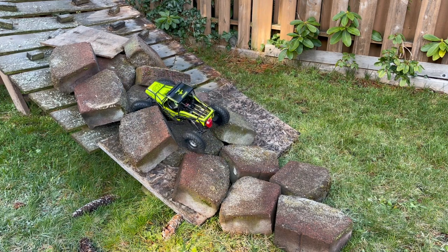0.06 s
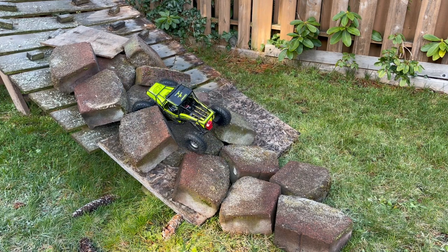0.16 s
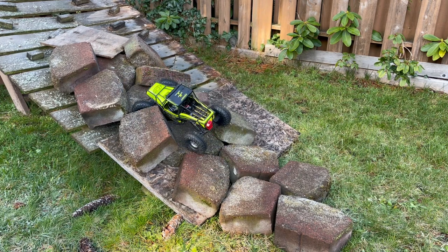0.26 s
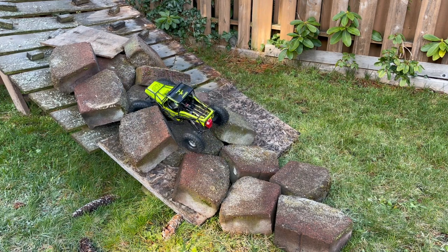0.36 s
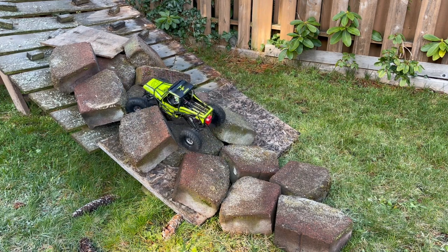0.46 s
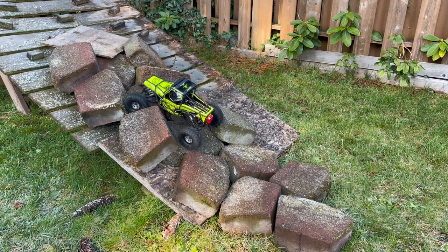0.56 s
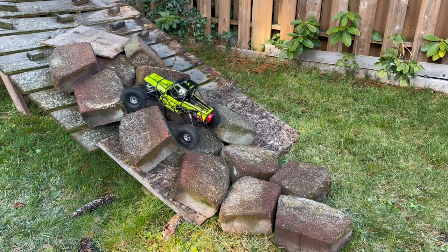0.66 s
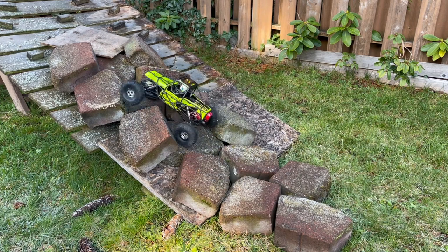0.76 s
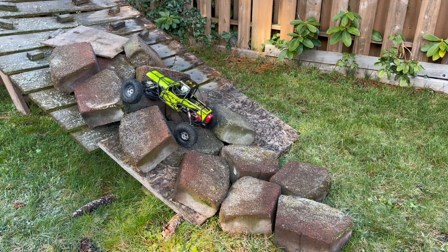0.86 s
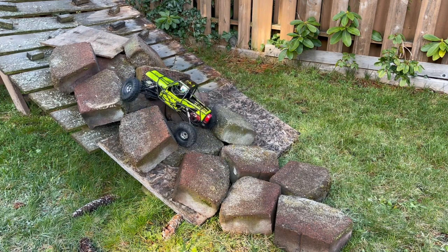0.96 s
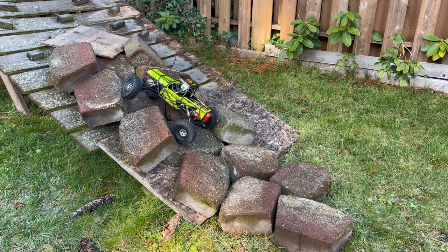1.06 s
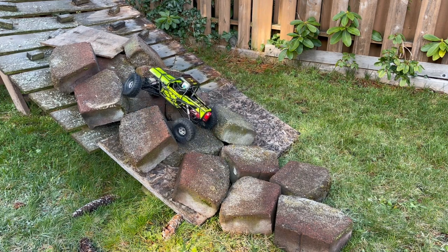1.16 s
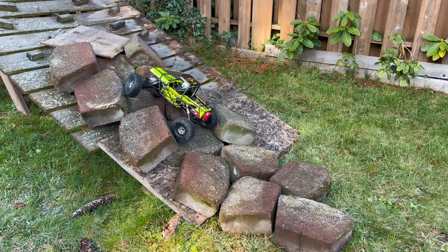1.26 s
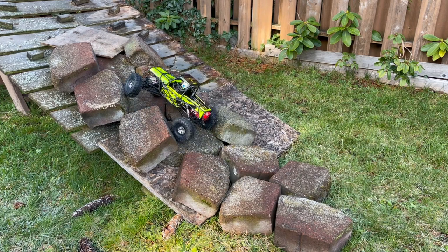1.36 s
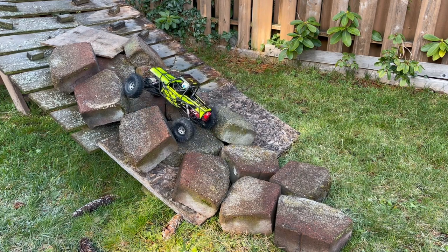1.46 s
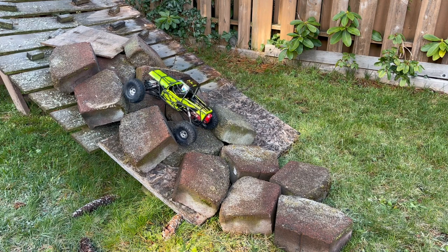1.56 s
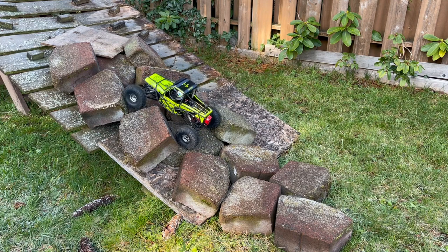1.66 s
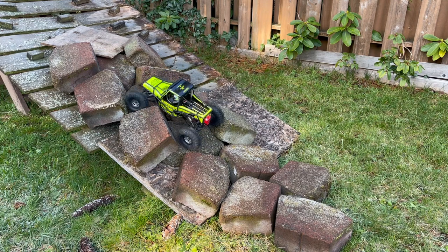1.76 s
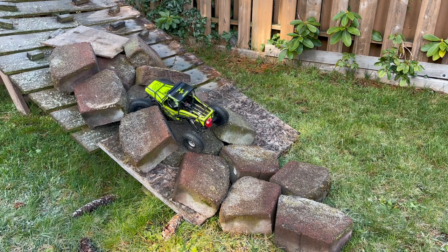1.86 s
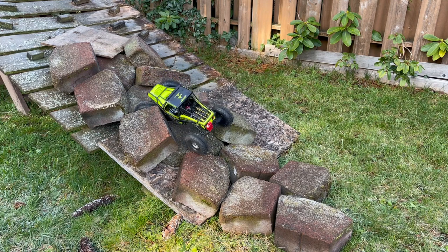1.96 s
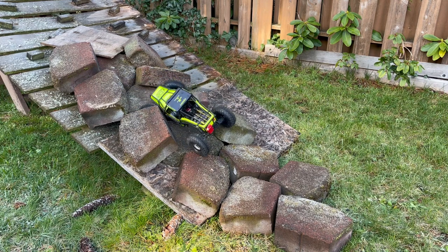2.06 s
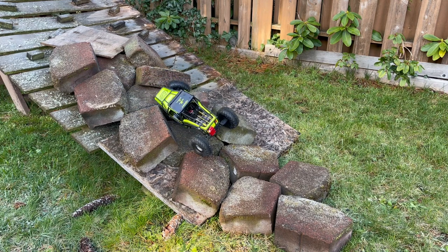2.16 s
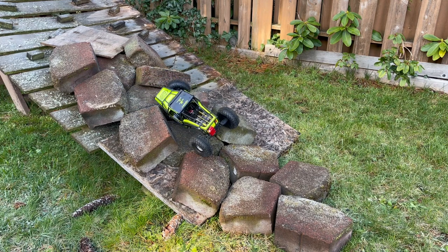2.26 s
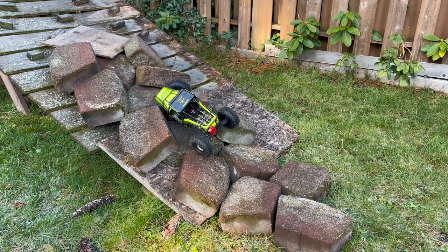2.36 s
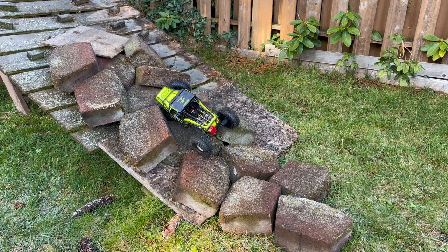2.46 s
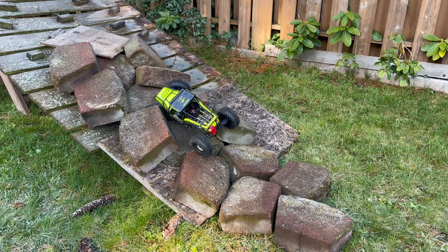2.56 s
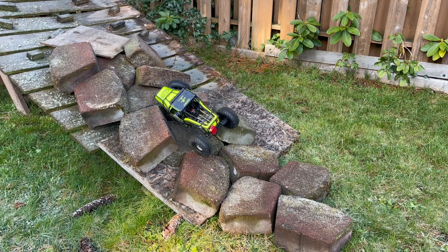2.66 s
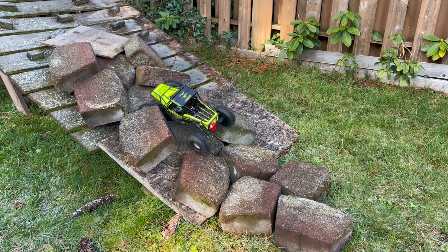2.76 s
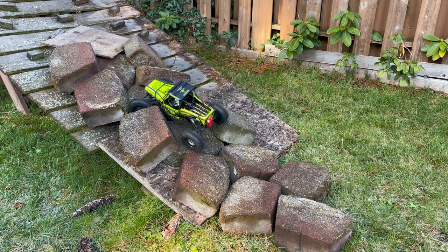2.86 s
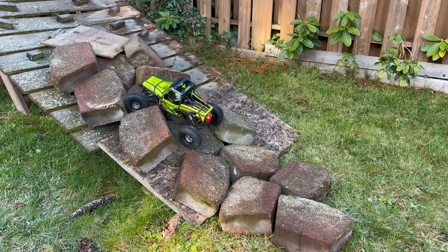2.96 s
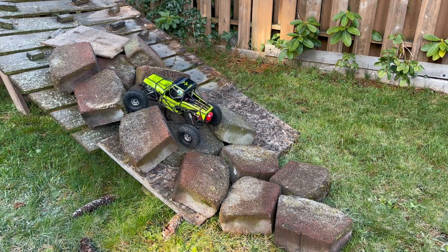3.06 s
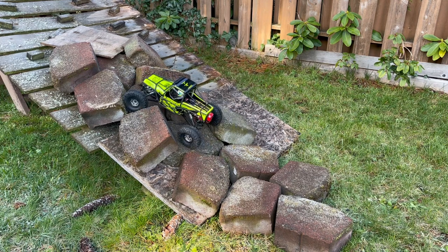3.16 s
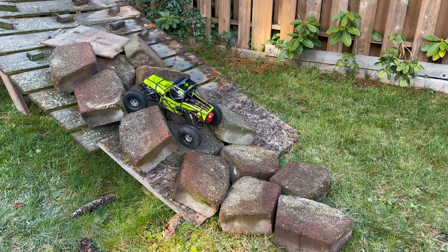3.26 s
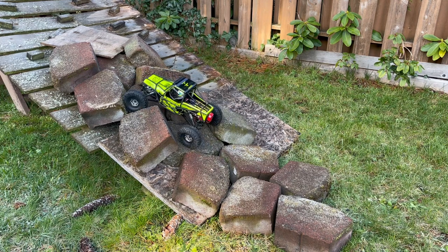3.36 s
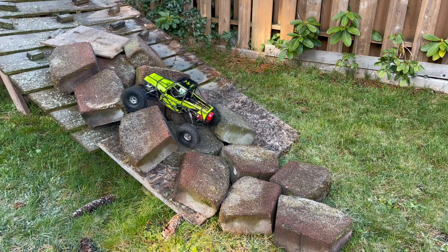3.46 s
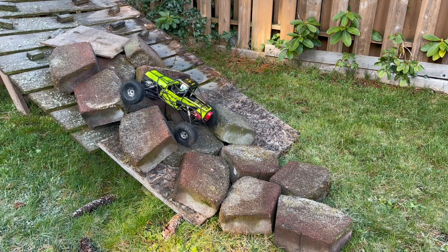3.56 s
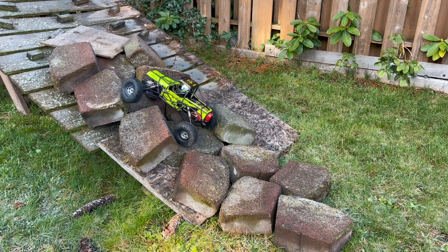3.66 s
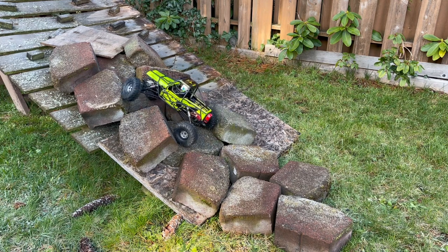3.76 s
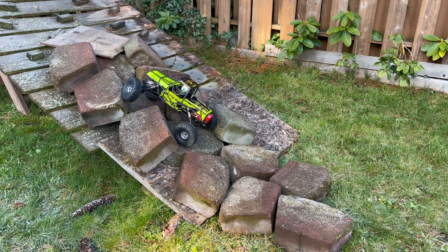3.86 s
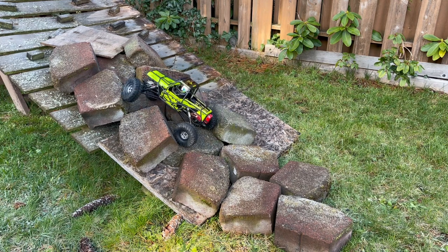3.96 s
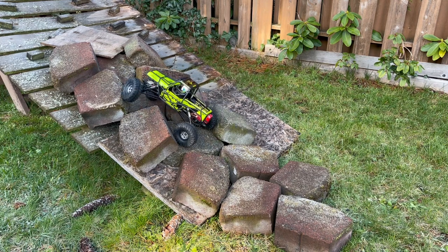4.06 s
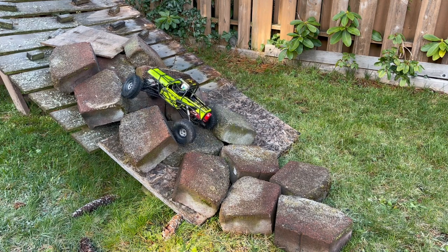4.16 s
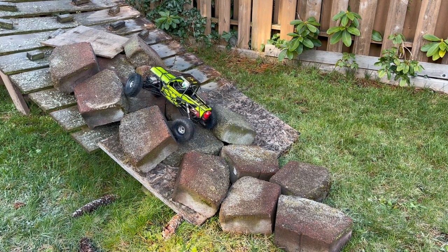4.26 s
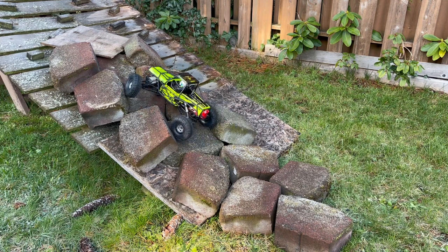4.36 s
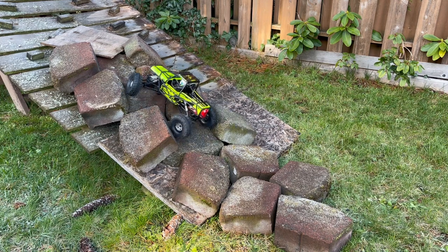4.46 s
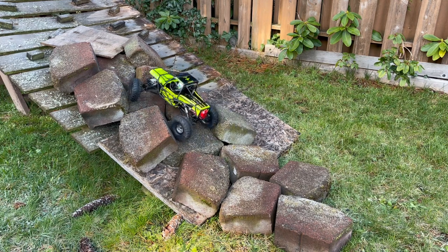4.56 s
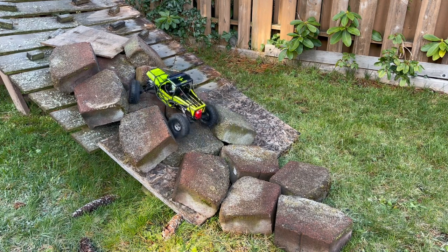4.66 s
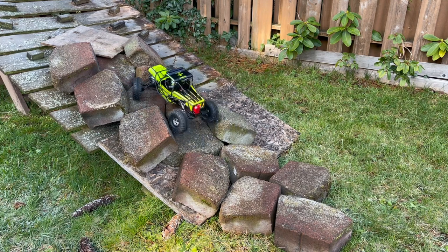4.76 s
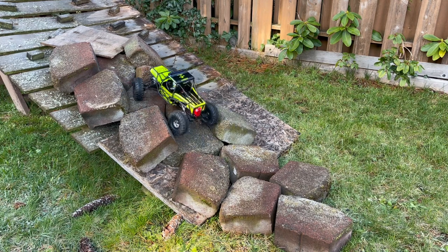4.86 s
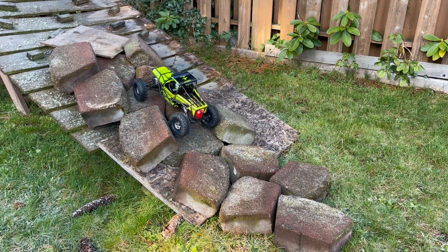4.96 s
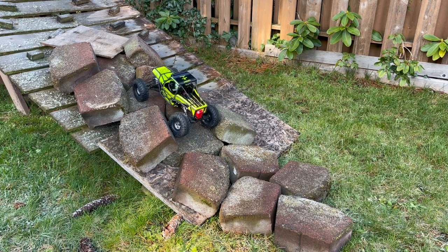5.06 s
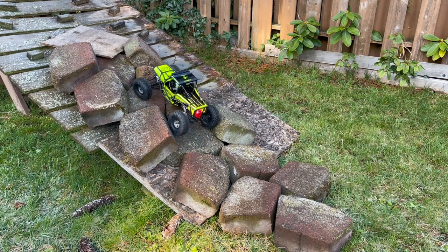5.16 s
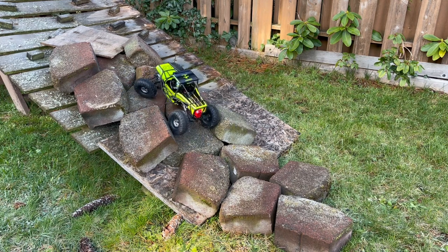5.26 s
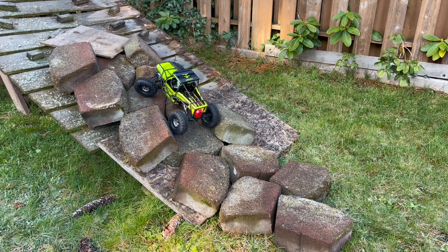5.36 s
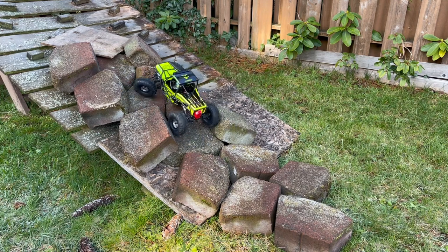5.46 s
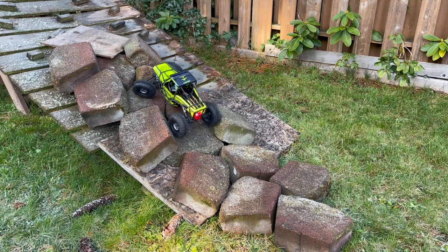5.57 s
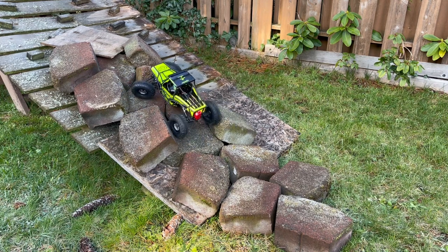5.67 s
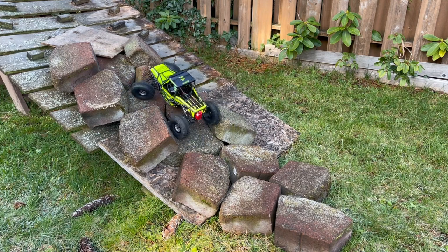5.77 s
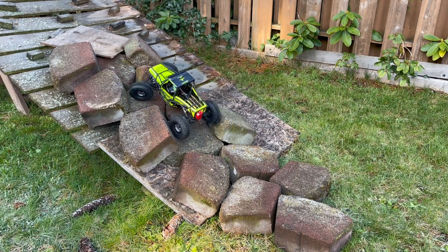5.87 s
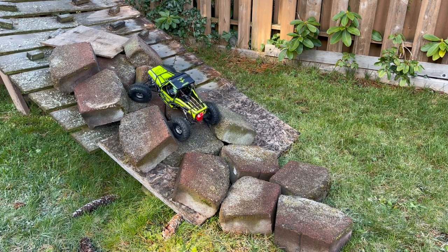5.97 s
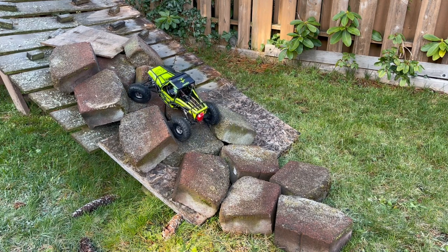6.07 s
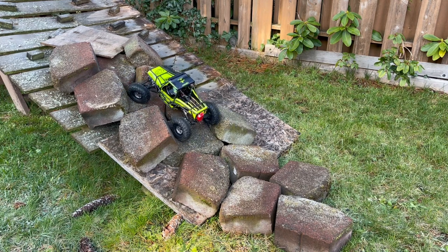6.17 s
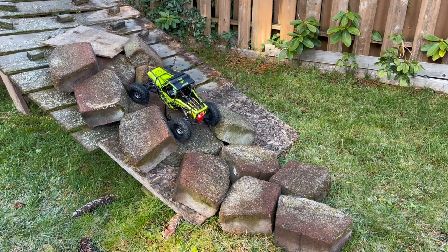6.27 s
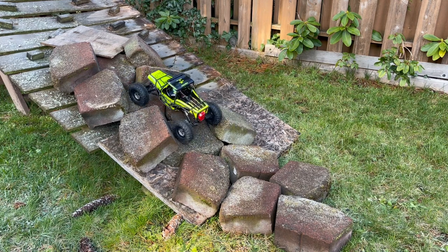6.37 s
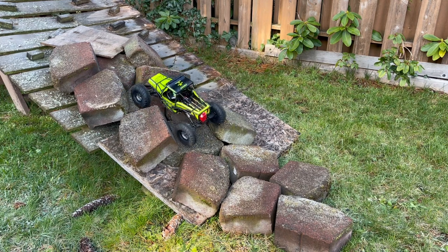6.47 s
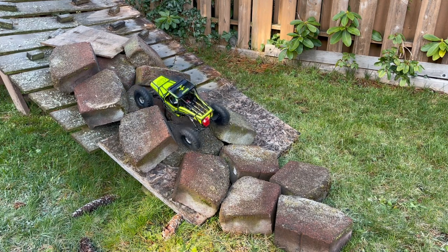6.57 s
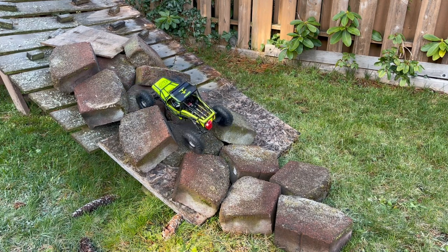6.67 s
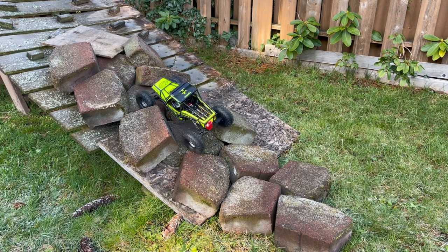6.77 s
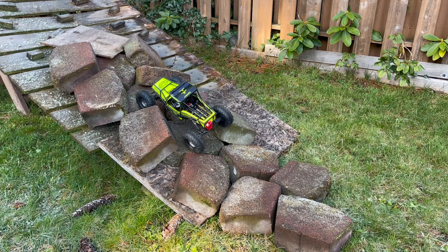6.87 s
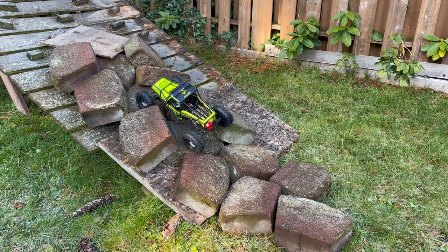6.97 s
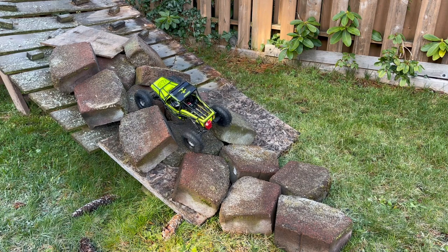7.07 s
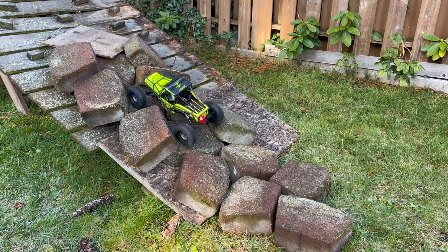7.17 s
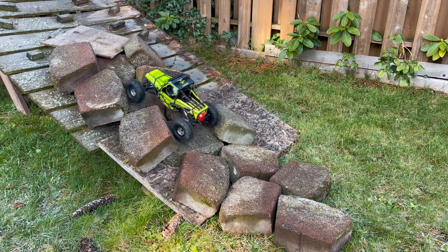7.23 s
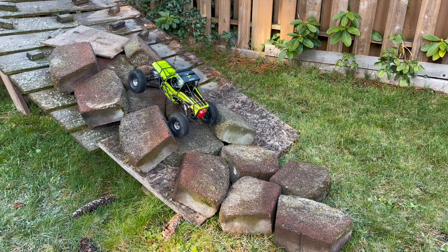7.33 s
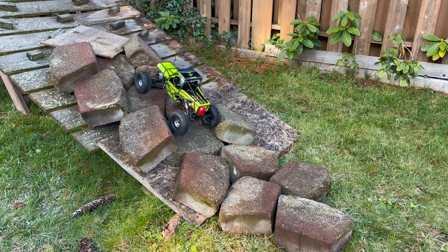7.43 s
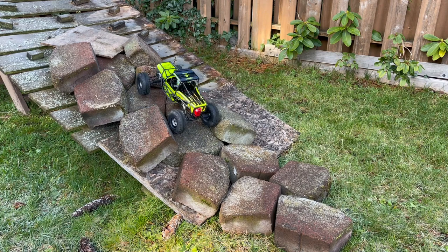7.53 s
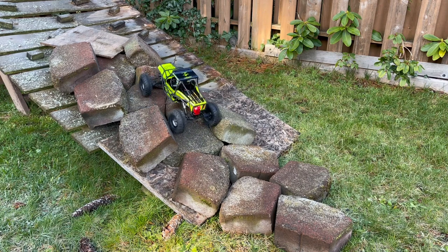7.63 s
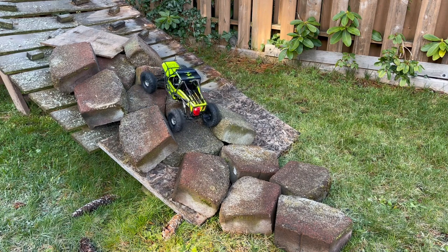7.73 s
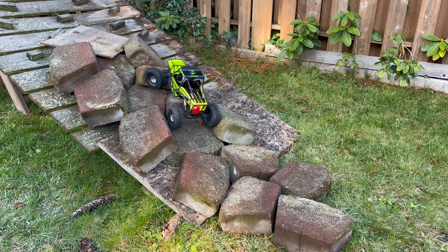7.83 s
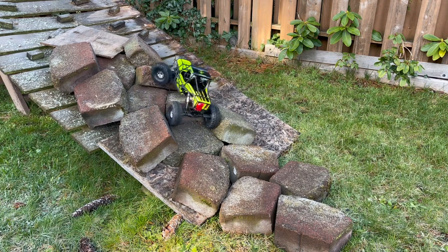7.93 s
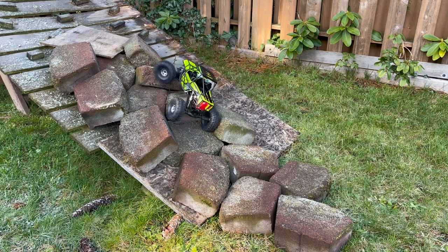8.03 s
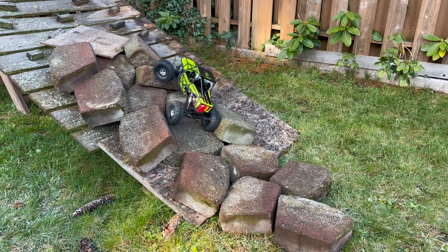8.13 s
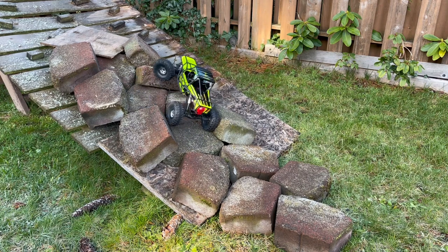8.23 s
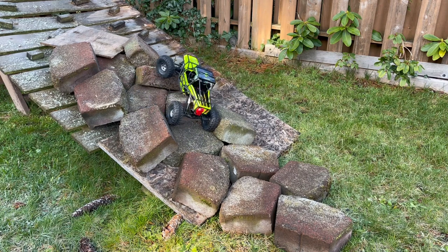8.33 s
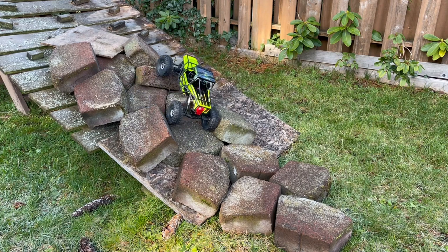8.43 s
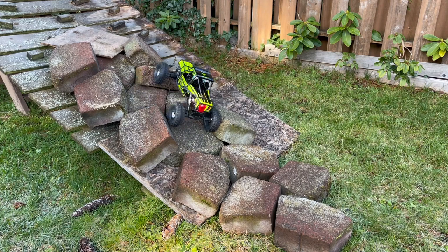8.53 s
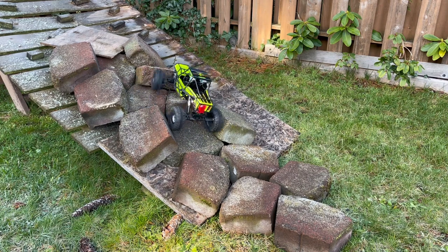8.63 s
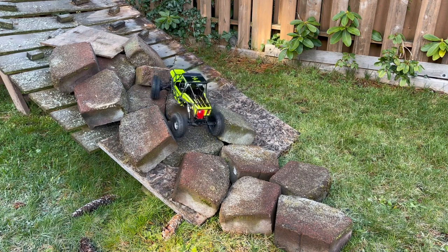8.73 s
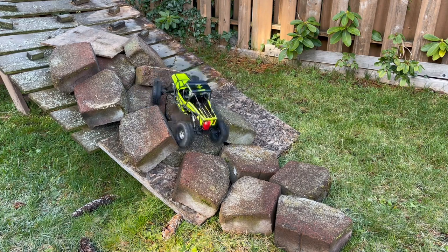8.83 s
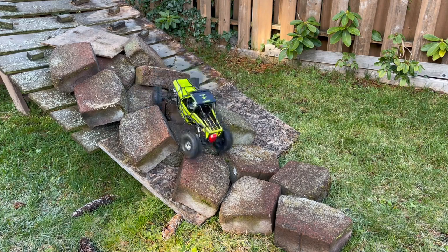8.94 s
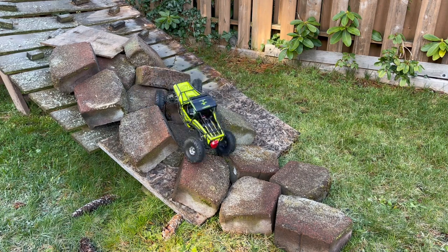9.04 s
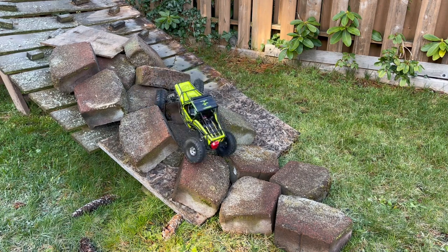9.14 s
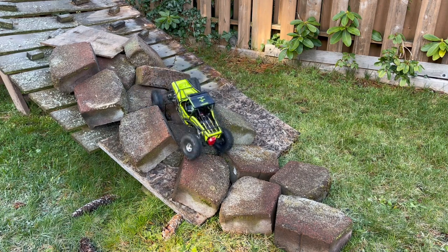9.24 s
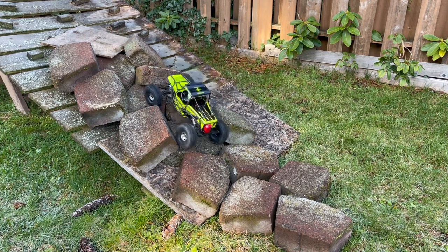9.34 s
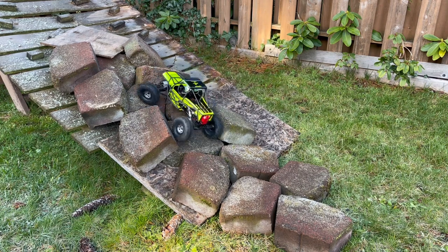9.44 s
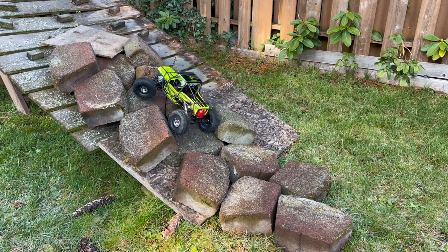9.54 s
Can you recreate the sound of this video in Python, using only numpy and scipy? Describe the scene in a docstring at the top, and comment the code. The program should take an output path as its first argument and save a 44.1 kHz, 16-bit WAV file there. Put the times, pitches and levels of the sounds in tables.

```python
"""A backyard of bricks: a small radio-controlled truck crawls over them in stop-start bursts of throttle.
Two gear stages whine and rasp as tones and noise that glide with the motor; brushes sizzle with it.
Damped noise gives knocks, ticks and snapping grit; unsteady sines at set pitches give short squeals.
Mostly in the pauses the steering servo buzzes as pulsed noise and the speed controller whistles faintly.
A far engine drones behind, with steady hums and the dull wash of the outdoors."""
import sys
import numpy as np
from scipy import signal
from scipy.fft import rfft, irfft, next_fast_len
from scipy.io import wavfile

SR = 44100
rng = np.random.default_rng(int(sys.argv[2]) if len(sys.argv) > 2 else 0)


def bounce(signal):
    """Save signal as a 16-bit WAV file at the path given by the first command-line argument."""
    frames = np.transpose(np.atleast_2d(signal))
    limited = np.clip(frames, -1, 1)
    pcm = np.round(limited * 32767).astype(np.int16)
    wavfile.write(sys.argv[1], SR, pcm)


N = 423360
TIME = np.arange(N) / SR
SIZE = next_fast_len(N + SR // 2)
BINS = np.maximum(np.arange(SIZE // 2 + 1) * SR / SIZE, 1)

PINION_TEETH = 20
# play in the gears: phase shake and once-a-turn phase swing, both in radians
BACKLASH, RUNOUT = .16, .26
# rate (Hz) at which the gear tones flutter as the load shifts
BREAK_HZ = 55


def from_db(db):
    """Logarithmic level: decibels become an amplitude gain."""
    return 10 ** (np.asarray(db) / 20)


def rms_one(x):
    """Power normalisation: scale to a mean square of one."""
    return x / np.sqrt(np.mean(x ** 2) + 1e-20)


def over_bins(points):
    """Spectral interpolation: read a table of (Hz, value) on a log-frequency axis."""
    hz, value = np.transpose(points)
    return np.interp(np.log(BINS), np.log(hz), value)


def shaped(x, gain):
    """Linear filtering: multiply the spectrum by a gain for each frequency."""
    return irfft(rfft(x, SIZE) * gain, SIZE)[..., :N]


def coloured(x, points):
    """Spectral colouring: filter by a spectrum in dB."""
    return shaped(x, from_db(over_bins(points)))


def drift(rate_hz, order=32):
    """Low-passed random process: slow chance of spread 1, drawn at a coarse step."""
    coarse = TIME[::order]
    hz = np.arange(len(coarse) // 2 + 1) * SR / N
    spectrum = rfft(rng.standard_normal(len(coarse))) / (1 + (hz / rate_hz) ** 2)
    slow = irfft(spectrum, len(coarse))
    return np.interp(TIME, coarse, rms_one(slow))


def switched(rows, ramp_s):
    """Gating: summed envelopes with straight ramps, from rows of start and end in seconds and dB."""
    total = 0
    for start, end, db in rows:
        edge_distance = np.minimum(TIME - start, end - TIME)
        total = total + from_db(db) * np.clip(edge_distance / ramp_s + .5, 0, 1)
    return total


def wide_noise(spread_db):
    """Source extent: the two ports hear slightly different mixtures of noise from a body of some size."""
    common = rng.standard_normal(N)
    difference = from_db(spread_db) * rng.standard_normal(N)
    return common + difference * [[1], [-1]]


def throttle(fade_s):
    """Motor dynamics: tooth rate, load, sizzle and whine offsets, and on-off envelope, burst by burst."""
    # Throttle bursts. Each row: start and end in seconds, offset of the brush sizzle in dB.
    bursts = [(-.05, .19, 3), (0.249, 1.304, -2.5), (1.499, 2.1, 1.5), (2.021, 2.379, 6.5),
              (2.599, 3.052, -1), (3.38, 3.819, 0), (4.079, 4.51, -1), (4.405, 4.82, 1.5),
              (5.11, 6.013, -0.2), (6.25, 6.723, 2), (7.015, 8.278, -0.6), (8.44, 9.124, 3),
              (9.15, 9.651, 1.5)]
    # The motor within each burst: gripping tyres slow it, the load rises and the gears sing out.
    # Each row: time in seconds, nominal tooth rate of the pinion in Hz, load in dB before its
    # flutter, offset of whine over rasp in dB.
    motor = [
        [(0.0, 1005, 3.5, -9), (0.09, 846, 1.5, -3)],
        [(0.3, 1082, 2.5, -4), (0.37, 1095, 2.5, 1), (0.41, 1343, 2, -3), (0.475, 1539, 2, -12),
         (0.505, 1445, 3, -5), (0.54, 1581, 3.5, -4), (0.655, 1870, 3.5, -7), (0.7, 1802, 4, -5),
         (0.735, 1633, 4.5, 0), (0.775, 1987, 2, -5), (0.8, 1759, 3.5, -3), (0.825, 1927, 2.5, -8),
         (0.86, 2032, 1.5, 2.5), (0.907, 1540.0, 7, -5.5), (0.952, 2006, 1.5, -1), (1.0, 1676, 4, -1),
         (1.025, 1960, 2.5, -9), (1.065, 1702, 6, 0), (1.105, 1730, -0.5, 3.5), (1.145, 1580, 3, 3),
         (1.19, 1731, 3.5, -1.5), (1.24, 1673, 4, -1)],
        [(1.615, 1500, 3.5, -14.5), (1.71, 1665, 2, -10), (1.79, 1767, 1.5, -7), (1.85, 1943, -1, -11),
         (1.92, 2003, -0.5, -22), (1.99, 1780.0, 2, -8), (2.047, 1545, 1.5, -11)],
        [(2.065, 1281, 3.5, 3), (2.12, 1291, -2, 4), (2.14, 1196, -2.5, 9.5), (2.175, 1207, -2, 5.5),
         (2.215, 883, 4, 0), (2.26, 1093, -2.5, 6)],
        [(2.65, 1381.0, 4.5, -13), (2.725, 1726, 4, 1.5), (2.804, 2343, 1, -3.5), (2.949, 2508, -1.5, -1.5),
         (2.979, 1725, 2, -2.5)],
        [(3.446, 1153, 4.5, -10), (3.487, 1756, 1, -0.5), (3.546, 1801, 4.5, -3), (3.59, 2200, -1, 0),
         (3.625, 2101, -1.5, 3.5), (3.654, 2227, 2, 1), (3.693, 1955, -1, 3.5), (3.725, 1187, 7.5, -6.5)],
        [(4.13, 1491, 2.5, 0), (4.16, 2033, 5.5, -4.5), (4.21, 2516, -1.5, -3), (4.23, 2422, 4.5, -10),
         (4.255, 2498, 0, -8), (4.304, 2211, -1.5, 2.5), (4.34, 1650, 3, 1), (4.365, 1853, 1.5, 0),
         (4.39, 1500.0, 0, -1)],
        [(4.465, 1152, 4, -1.5), (4.485, 1606, 2, -3.5), (4.51, 2073, -2, 3.5), (4.535, 2613, 0.5, -9),
         (4.566, 2855, 0, -4), (4.61, 2104, 4, -2), (4.66, 2720, -1, -2), (4.7, 2108, 2, -5.5),
         (4.745, 1515, 0.5, 0.5)],
        [(5.19, 1588, 5, -3.5), (5.225, 1844, 0.5, -2.5), (5.255, 2300.0, 1, -1), (5.29, 2118, 3, 0.5),
         (5.325, 1898, 6, -4.5), (5.36, 2040, 1, 2.5), (5.385, 2291, 2.5, -3.5), (5.418, 2293, -2.5, 4.5),
         (5.448, 1828, 6.5, 2.5), (5.475, 1932, 4, 0.5), (5.5, 2222, 0.5, 0), (5.515, 2130, 3.5, -1),
         (5.535, 2412, -0.5, -4), (5.57, 2110, 3.5, -1), (5.595, 1828, 4.5, -1), (5.625, 2202, 2.5, -8),
         (5.652, 1995, 4.5, -4), (5.695, 2608, 0, -4), (5.795, 2914, 1.5, -8), (5.835, 2297, 3.5, -2),
         (5.893, 2836, -2.5, -2), (5.935, 2017, 1.5, -1.5)],
        [(6.262, 1364, -13.5, 5), (6.31, 1445, 3, -12), (6.39, 1480, 0, -4), (6.43, 1620, 2.5, -13),
         (6.48, 1830, 0, -19), (6.55, 1466, 0, -11), (6.61, 1175, 1.5, -6)],
        [(7.085, 1783, 2.5, -1.5), (7.135, 2802, -1, 4), (7.215, 3113, -1.5, 1), (7.26, 2886, 2, -3),
         (7.295, 2580, 1, 1), (7.34, 2634, 2, -2), (7.385, 3083, -2, -3.5), (7.448, 3443, 0, -9.5),
         (7.485, 2735, 1, 4), (7.516, 2053, 2, 1), (7.56, 2800, -0.5, 1), (7.622, 3164, 0, -4),
         (7.655, 2800, 4, -7), (7.735, 2718, 3.5, 0), (7.762, 2513, -1, 6.5), (7.818, 2936, 0.5, -2.5),
         (7.86, 2644, 4, -3), (7.915, 2876, 1, -5), (7.95, 3063, 1.0, -3), (8.02, 3057, 1, -5.5),
         (8.045, 2948, 4, -7), (8.17, 2975, 2, -4), (8.195, 2597, 2, -10), (8.225, 2090, 5.5, -5)],
        [(8.49, 1898, 0, -11), (8.6, 2052, 2.5, -30), (8.7, 2105, 0, -12), (8.82, 2032, -1, -5),
         (8.98, 2070, -2.5, -9), (9.05, 1984, -1.5, -7)],
        [(9.205, 2007, 1.5, -3), (9.27, 2470, -1, 2.5), (9.295, 2810, -2.5, 5), (9.35, 3046, -1, 1.5),
         (9.43, 3180.0, 0, -5), (9.465, 2780.0, 3, -6), (9.51, 2596, 3.5, -8), (9.59, 2369, 2.5, 1.5)],
    ]
    # every burst spins up from this tooth rate and coasts back to it,
    # while the load runs to a set value at the end
    crawl_hz, coast_load_db = 498.9, -0.5
    coast_whine_db = -7   # the gears run slack at both ends of a burst
    mesh_hz, running = np.full(N, float(crawl_hz)), np.zeros(N)
    load_db, sizzle_db, whine_db = np.zeros((3, N))
    for (start, end, sizzle), rows in zip(bursts, motor):
        s, hz, load, whine = np.transpose(rows)
        whole_burst = [start, *s, end]
        speed = np.interp(TIME, whole_burst, [crawl_hz, *hz, crawl_hz])
        on = speed > mesh_hz   # a new burst may catch the motor while it still coasts
        mesh_hz[on] = speed[on]
        load_db[on] = np.interp(TIME[on], [*s, end], [*load, coast_load_db])
        sizzle_db[on] = sizzle
        whine_db[on] = np.interp(TIME[on], whole_burst, [coast_whine_db, *whine, coast_whine_db])
        running = np.maximum(running, switched([(start, end, 0)], fade_s))
    return mesh_hz, load_db, sizzle_db, whine_db, running


def with_speed(mesh_hz, knee_hz, power):
    """Power law with saturation: gain rises as a power of the speed and levels off above a knee."""
    return 1 / np.hypot(1, (knee_hz / mesh_hz) ** power)


def backlash_shake(mesh_hz, load_db):
    """Backlash: phase shake grows with load, at low speed where gears chatter, and a little at high speed."""
    smooth_hz = 1500   # below this tooth rate the motor cogs and the gears chatter
    slack = BACKLASH * np.clip(smooth_hz / mesh_hz, 1, 2) ** 4
    slack += .06 * (mesh_hz / 3000) ** 2
    return slack * from_db(.6 * load_db)   # dB of shake per dB of load


def gear_whine(teeth, wobble, slack):
    """Meshing harmonics, phase-modulated by backlash and runout, throb once a turn through the housing."""
    # Gear tones as multiples of the pinion's tooth rate; the second stage meshes at 0.61 of it.
    orders = [.61, 1, 1.22, 1.61, 2, 3, 3.7, 4]
    # Mean level of each tone in dB, relative to one another before the housing.
    tone_db = [-6, -2, -11, -11, -0.5, -13, -18, -17]
    # Phase shake of each tone as a multiple of the slack; the slow second stage has more play.
    shakes = [2.3, 1.7, 3.2, 3.8, 2.7, 3.6, 5, 5]
    # Response of the housing. Each row: frequency in Hz, gain in dB.
    housing = [(500, 1.5), (800, -5.5), (1030, -3), (1200, -6), (1480, 2), (1800, -6), (2150, -2.5),
               (2450, -6), (2900, 0), (3400, 1.5), (3750, 2), (4100, 5), (4500, -6.5), (5150, -17),
               (5500, -8.5), (6000, -0.5), (6600, 2), (7300, 3.5), (8600, 7.5), (9800, 5.5), (10900, 5),
               (13000, -31)]
    break_db = 3.8   # spread of the flutter as the load shifts
    turn = 2 * np.pi * teeth / PINION_TEETH
    mesh = 2 * np.pi * teeth + wobble * np.sin(turn)
    tones = 0
    for order, db, shake in zip(orders, tone_db, shakes):
        level = from_db(db + break_db * np.minimum(drift(BREAK_HZ), 2))
        tones = tones + level * np.sin(order * mesh + slack * shake * drift(170))
    throb = 1 + .22 * np.cos(turn)
    return coloured(throb * tones, housing)


def once_a_turn(teeth, sharpness):
    """Rotor runout: the pinion bites hardest once a turn, with a lesser bite half a turn later."""
    turn = 2 * np.pi * teeth / PINION_TEETH
    return rms_one(np.exp(sharpness * np.cos(turn)) + np.exp(sharpness * np.cos(2 * turn)))


def worn_teeth(x, teeth, memory):
    """Cyclic correlation: worn teeth return each turn, so the noise partly repeats at the motor's rate."""
    turn_ago = np.interp(teeth - PINION_TEETH, teeth, TIME)
    repeated = np.array([np.interp(turn_ago, TIME, side) for side in x])
    return (x + memory * repeated) / np.hypot(1, memory)


def gear_rasp(teeth, bite, uneven_db):
    """Modulated friction noise: each tooth scrapes with its own strength and excites the gearbox."""
    # Response of the gearbox. Each row: frequency in Hz, gain in dB.
    gearbox = [(100, -3.5), (250, -6), (700, -4.5), (1050, -1.5), (1250, -3.5), (1800, 4), (2350, 1.5),
               (2850, 6), (3500, -2), (3870, 2.5), (4070, 3), (4300, -2), (4700, -3.5), (6000, -6.5),
               (9000, -3), (15000, -58)]
    strength = from_db(uneven_db * rng.standard_normal(N))[teeth.astype(int)]
    pulses = np.exp(bite * np.cos(2 * np.pi * teeth))
    scrape = strength * pulses * wide_noise(spread_db=-23.0)
    return rms_one(coloured(scrape * once_a_turn(teeth, sharpness=0.073), gearbox))


def swells(teeth, ramp_s):
    """Harmonic excitation: teeth pressed hard sing on one harmonic that glides with the motor and flutters."""
    # Swells under strain. Each row: start and end in seconds, multiple of the tooth rate,
    # mean level in dB before the flutter.
    strained = [(0.411, 0.563, 2, -38.5), (0.821, .88, 2, -34), (1.06, 1.25, 1, -52.5),
                (1.625, 1.7, 2, -50), (2.049, 2.13, 1, -52), (2.735, 2.86, 1, -40), (2.76, 2.92, 3, -46),
                (4.195, 4.306, 3, -40), (4.274, 4.387, 1, -51), (4.53, 4.6, 2, -47), (4.675, 4.725, 2, -39),
                (5.239, 5.47, 1, -43), (5.275, 5.315, 2, -42), (5.433, 5.465, 3, -43),
                (5.558, 5.595, 2, -39), (5.575, 5.609, 1, -38), (5.582, 5.61, 3, -44),
                (5.617, 5.662, 2, -38), (5.794, 5.871, 3, -42), (6.435, 6.51, 1, -51),
                (7.599, 7.645, 2, -38), (7.625, 7.708, 1, -38), (7.63, 7.75, 3, -46),
                (7.877, 7.925, 1, -35), (8.037, 8.175, 2, -35.5), (8.04, 8.2, 1, -43),
                (8.039, 8.151, 3, -34.5), (8.581, 8.8, 2, -52), (8.62, 9.04, 1, -52.5),
                (9.345, 9.388, 2, -39), (9.44, 9.5, 1, -38.5), (9.515, 9.612, 3, -39.5)]
    runout = RUNOUT * np.sin(2 * np.pi * teeth / PINION_TEETH)
    mesh = 2 * np.pi * teeth + runout + BACKLASH * drift(170)
    flutter = from_db(3 * drift(BREAK_HZ))
    tones = sum(switched([(a, b, db)], ramp_s) * np.cos(round(k) * mesh) for a, b, k, db in strained)
    return np.sqrt(2) * flutter * tones


def brush_sizzle(teeth, flicker_db, wander_db):
    """Commutation noise: brushes rub and spark in step with the rotor; their contact flickers and wanders."""
    # Spectrum of the brushes. Each row: frequency in Hz, gain in dB.
    brushes = [(1500, -40), (4000, -19), (5200, -9.5), (6300, -13), (7000, -8), (8400, -1.5), (9200, 1.5),
               (10000, 7.5), (10900, 7), (11700, -8.5), (12600, -17.5), (14300, -20), (15200, -38.5)]
    contact = from_db(flicker_db * drift(37) + wander_db * drift(9))
    sparks = wide_noise(spread_db=-67) * once_a_turn(teeth, sharpness=0.27) * contact
    return rms_one(coloured(sparks, brushes))


def squeals_and_growls(teeth, ramp_s, throb):
    """Random frequency modulation: gears and housing under strain squeal or growl, throbbing with the rotor."""
    # Short unsteady squeals and growls. Each row: start and end in seconds, mean pitch in Hz,
    # pitch scatter in Hz, relative level in dB.
    strained_tones = [(0.343, 0.37, 1395, 201, -49), (2.648, 2.719, 1559, 158.6, -50.5),
                      (2.794, 2.951, 4070, 129.7, -54), (2.804, 2.94, 2870, 129.8, -53),
                      (4.225, 4.375, 4058, 69.9, -51.5), (6.411, 6.52, 3254, 109.6, -50.5),
                      (7.472, 7.54, 10940, 250.1, -41.5), (7.499, 7.535, 2090, 222.4, -44),
                      (7.738, 7.766, 10880, 250.8, -37), (7.8, 7.881, 10870, 245, -45),
                      (7.922, 7.971, 3550, 120.3, -47.5), (7.972, 8.047, 3783, 119.1, -49),
                      (8.171, 8.213, 10700, 230, -34.5), (8.178, 8.212, 7750, 159.6, -44),
                      (9.418, 9.48, 8750, 329.8, -39.5), (9.445, 9.551, 10800, 220.4, -36),
                      (9.553, 9.61, 4076, 110, -50)]
    unsteady = drift(300)
    tones = 0
    for start, end, hz, scatter_hz, db in strained_tones:
        phase = 2 * np.pi * np.cumsum(hz + scatter_hz * unsteady) / SR
        tones = tones + switched([(start, end, db)], ramp_s) * np.sin(phase)
    rotor = 1 + throb * np.cos(2 * np.pi * teeth / PINION_TEETH)
    return from_db(8.5) * np.sqrt(2) * tones * rotor


def contacts(rows, colour, decay_s):
    """Damped impact: each blow is coloured noise under an exponential decay."""
    envelope = np.zeros(N)
    age = TIME[:SR // 5]
    for s, db in rows:
        at = int(s * SR)
        envelope[at:at + len(age)] += (from_db(db) * np.exp(-age / decay_s))[:N - at]
    return envelope * rms_one(coloured(rng.standard_normal(N), colour))


def tyre_bumps():
    """Impact on brick: tyres and chassis knock, then the soft tyres thud on more slowly."""
    # Bumps on brick. Each row: time in seconds, relative level in dB.
    bumps = [(0.327, -44), (0.992, -36.5), (4.222, -34), (4.334, -39), (4.564, -40), (4.594, -27.5),
             (4.624, -37), (5.192, -33.5), (5.39, -33), (5.711, -37), (5.819, -33), (7.468, -30.5),
             (7.512, -26), (7.527, -47), (7.75, -30), (7.983, -35), (8.187, -31.5), (8.911, -37.5)]
    # Spectrum of the knock. Each row: frequency in Hz, gain in dB.
    knock_colour = [(50, -3), (140, 11.5), (300, 9), (600, 7.5), (1100, 10), (2200, 5.5), (4500, -43.5),
                    (12000, -55)]
    # Spectrum of the thud. Each row: frequency in Hz, gain in dB.
    thud_colour = [(50, -8.5), (130, -3), (190, -7), (300, -15.5), (800, -46), (3000, -72)]
    knock = from_db(-4.5) * contacts(bumps, knock_colour, decay_s=0.015)
    thud = from_db(-20.0) * contacts(bumps, thud_colour, decay_s=0.082)
    return knock + thud


def link_and_gear_ticks():
    """Impact of light parts: short ticks of links, and of gears taking up slack as a burst starts."""
    # Ticks of links and gears. Each row: time in seconds, relative level in dB.
    ticks = [(3.109, -35), (3.1275, -27.5), (3.1517, -33), (3.4033, -28.5), (4.0932, -34), (7.003, -33.5),
             (8.4137, -27.5), (9.1551, -29)]
    # Spectrum of a tick. Each row: frequency in Hz, gain in dB.
    tick_colour = [(300, -22), (1400, 8.5), (2800, 6), (5000, -0.5), (7000, -5), (13000, -44), (15000, -62)]
    return from_db(-14.5) * contacts(ticks, tick_colour, decay_s=0.0049)


def grit_snaps():
    """Brittle impact: grit snaps under the tyres as bright noise that dies within milliseconds."""
    # Snaps of grit. Each row: time in seconds, relative level in dB.
    grit = [(1.991, -28), (2.014, -32), (4.218, -21.5), (6.277, -37), (6.387, -28), (7.627, -21.5),
            (7.849, -22), (7.864, -28), (9.037, -25), (9.061, -32), (9.092, -36)]
    # Spectrum of a snap. Each row: frequency in Hz, gain in dB.
    grit_colour = [(1000, -19), (4000, -8), (7000, -8), (10500, 7), (13000, -25), (15000, -40)]
    return from_db(-3.0) * contacts(grit, grit_colour, decay_s=0.002)


def servo(pulse_hz, depth):
    """Amplitude modulation: unsteady drive pulses rattle the steering servo's tiny metal gears."""
    # Steering servo at work. Each row: start and end in seconds, level in dB.
    steering = [(1.3, 1.37, -55.5), (1.36, 1.56, -43.5), (2.3, 2.49, -57), (3.04, 3.25, -61.5),
                (4.8, 5.15, -47.5), (6.02, 6.29, -51.5), (8.28, 8.47, -48), (9.08, 9.17, -61)]
    # Spectrum of the servo. Each row: frequency in Hz, gain in dB.
    servo_colour = [(400, -11.5), (1800, -11), (2800, -15), (4100, -8), (4700, 1.5), (5100, -9), (5700, 1),
                    (6100, -7), (6550, -4), (7000, -8), (8300, -1), (9200, 6), (10600, 6.5), (12200, -21.5),
                    (13500, -59)]
    phase = 2 * np.pi * np.cumsum(pulse_hz * (1 + 0.067 * drift(15.0))) / SR
    rattle = np.exp(depth * np.cos(phase)) * rng.standard_normal(N)
    return switched(steering, ramp_s=0.02) * rms_one(coloured(rattle, servo_colour))


def windings(ramp_s):
    """Switching tones: the speed controller whistles thinly in the windings at low throttle."""
    # Whistles. Each row: start and end in seconds, frequency in Hz, level in dB.
    singing = [(0.223, 0.444, 7960, -64), (2.18, 2.42, 8060, -60), (2.558, 2.66, 7968, -69),
               (3.336, 3.431, 7950, -74), (4.039, 4.118, 8000, -75), (6.66, 6.738, 7050, -72),
               (6.983, 7.063, 7960, -65)]
    return sum(switched([(a, b, db)], ramp_s) * np.sin(2 * np.pi * hz * TIME) for a, b, hz, db in singing)


def truck_sound():
    """Superposition: motor speed and load drive the gears and brushes, and the other parts add to them."""
    mesh_hz, load_db, sizzle_db, whine_db, running = throttle(fade_s=0.06)
    grip = drift(25.15)   # the tyres catch and slip on the stone
    load_db = load_db + 0.67 * grip
    teeth = np.cumsum(mesh_hz * (1 - .009 * grip)) / SR   # teeth gone by; each catch slows the motor
    slack = backlash_shake(mesh_hz, load_db)
    rasp = running * from_db(-37.5 + load_db) * with_speed(mesh_hz, knee_hz=2004, power=2.07)
    whine = rasp * from_db(2.55 + whine_db)
    # the sizzle keeps growing to a higher speed than the rasp
    sizzle = running * from_db(-27.5 + sizzle_db + load_db) * with_speed(mesh_hz, knee_hz=3146, power=2.57)
    truck = rasp * worn_teeth(gear_rasp(teeth, bite=0.98, uneven_db=2.0), teeth, memory=0.18)
    truck += whine * gear_whine(teeth, wobble=RUNOUT, slack=slack)
    truck += sizzle * worn_teeth(brush_sizzle(teeth, flicker_db=2.0, wander_db=0.8), teeth, memory=0.11)
    truck += swells(teeth, ramp_s=0.012)
    truck += squeals_and_growls(teeth, ramp_s=0.0099, throb=.35)
    truck += tyre_bumps() + link_and_gear_ticks() + grit_snaps()
    truck += servo(pulse_hz=308, depth=0.25) + windings(ramp_s=0.019)
    return truck


def at_microphone(x, decay_s):
    """Interference and scattering: two ports differ in phase and level; bricks and fence scatter briefly."""
    # Phase between the ports. Each row: frequency in Hz, lead of the left in radians.
    port_phase = [(100, 0), (2000, 0), (3000, 1.3), (5600, 1.25), (6900, -.3), (7500, 1.1), (8400, 0),
                  (8750, -.15), (10200, -3.14), (11000, -4.4), (11600, -6.2), (12600, -6.3), (13500, -9.4),
                  (14250, -9.5), (15000, -12.5)]
    # Balance of the ports. Each row: frequency in Hz, left over right in dB.
    port_balance = [(100, 1), (1000, 1.6), (3000, 1), (4700, 5.5), (7100, 6.5), (8000, 3), (8700, -0.5),
                    (15000, 0.5)]
    # Sound scattered by bricks and fence. Each row: frequency in Hz, level in dB.
    scatter = [(200, -14), (2000, -6.5), (3500, -9), (5000, -10.5), (6500, -9), (8300, -3), (12000, -49.5)]
    age = TIME[:SR // 6]
    echoes = rng.standard_normal((2, len(age))) * np.exp(-age / decay_s) * (age > .002)
    echoes /= np.sqrt(np.sum(echoes ** 2, axis=1, keepdims=True))
    direct = np.exp(.5j * over_bins(port_phase) * [[1], [-1]])
    balance = from_db(.5 * over_bins(port_balance) * [[1], [-1]])
    return shaped(x, balance * (direct + from_db(over_bins(scatter)) * rfft(echoes, SIZE)))


def far_engine(throb_db):
    """Frequency and amplitude modulation: a far engine's drone glides, wavers and throbs slowly."""
    # The far engine. Each row: time in seconds, frequency in Hz before its waver, mean level in dB.
    engine = [(0.0, 66, -45), (2.65, 74, -50.5), (3.1, 62, -42), (5.8, 66, -39), (6.1, 60, -45),
              (7.7, 60, -43.5), (9.6, 60, -56)]
    s, hz, level_db = np.transpose(engine)
    phase = 2 * np.pi * np.cumsum(np.interp(TIME, s, hz)) / SR + drift(4.2)
    return from_db(np.interp(TIME, s, level_db) + throb_db * drift(4.2)) * np.sin(phase)


def steady_hums():
    """Narrow-band noise: each neighbourhood hum is white noise passed through one resonance."""
    # Hums. Each row: centre frequency in Hz, width in Hz, level in dB.
    hum_rows = [(62.3, 7.5, -60.5), (66.2, 1.3, -53.5), (157.9, 4.4, -65), (384.4, 10, -71.5),
                (1365, 53, -70)]
    total = 0
    for hz, width_hz, db in hum_rows:
        resonance = 1 / (1 + (2 * (BINS - hz) / width_hz) ** 2)
        total = total + from_db(db) * rms_one(shaped(rng.standard_normal(N), resonance))
    return total


def yard_wash(side_db):
    """Diffuse field: the dull outdoor wash is partly incoherent between the ports, least so in the bass."""
    # Spectrum of the outdoors. Each row: frequency in Hz, gain in dB.
    yard = [(20, -26), (33, -33.5), (45, 2.5), (75, -0.5), (95, -8.5), (160, -12), (250, -20.5),
            (500, -25.5), (1000, -30), (2000, -38.5), (4000, -52.5), (8000, -60), (15000, -75.5)]
    mid, side = from_db(-47.5) * rms_one(coloured(rng.standard_normal((2, N)), yard))
    side = coloured(side, [(60, -16.5), (250, -5.0), (1000, 3.5)])   # long waves reach both ports alike
    return mid + from_db(side_db) * side * [[1], [-1]]


def scene():
    """Superposition: the truck among the bricks, over the neighbourhood."""
    neighbourhood = far_engine(throb_db=1.5) + steady_hums() + yard_wash(side_db=-2.5)
    return at_microphone(truck_sound(), decay_s=0.035) + neighbourhood


def record(dry):
    """Band limiting: an elliptic low-pass cuts the top steeply."""
    cutoff_hz = 15300
    return signal.sosfilt(signal.ellip(10, .1, 80, cutoff_hz, fs=SR, output="sos"), dry)


dry = scene()
out = record(dry)
bounce(out)
```